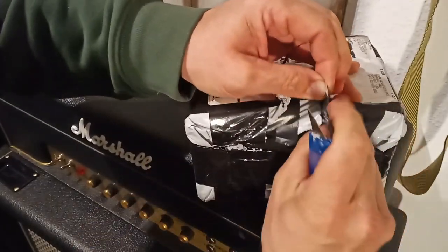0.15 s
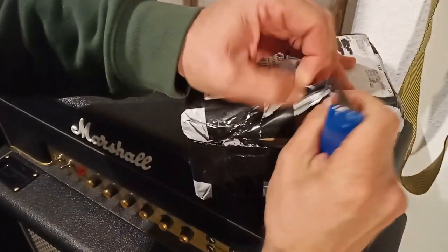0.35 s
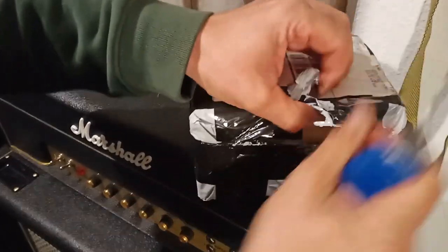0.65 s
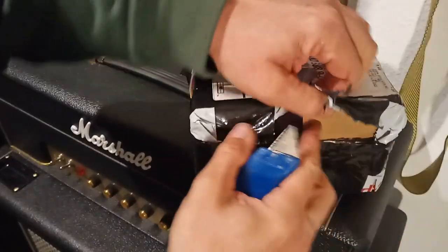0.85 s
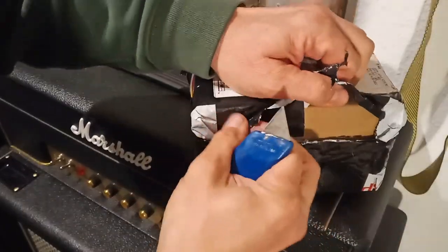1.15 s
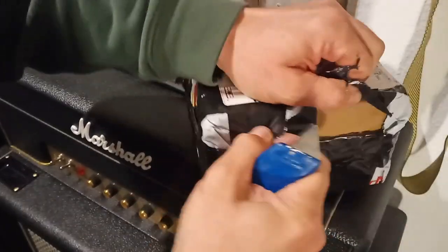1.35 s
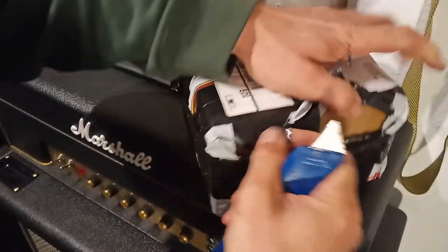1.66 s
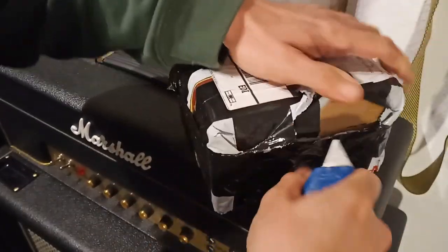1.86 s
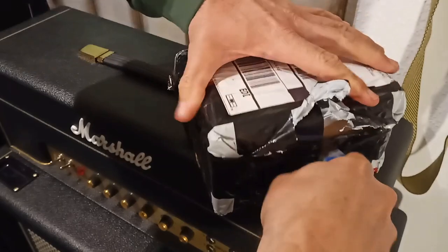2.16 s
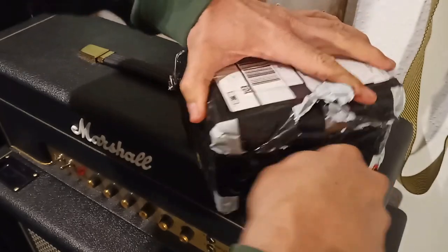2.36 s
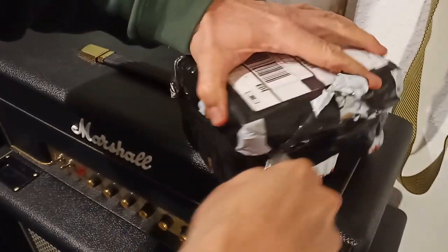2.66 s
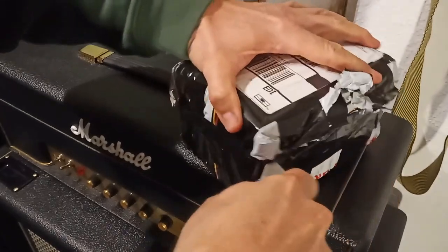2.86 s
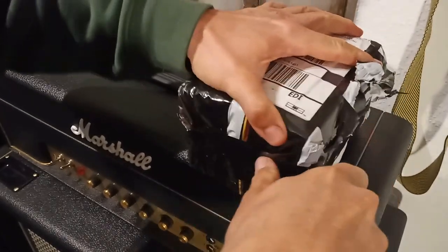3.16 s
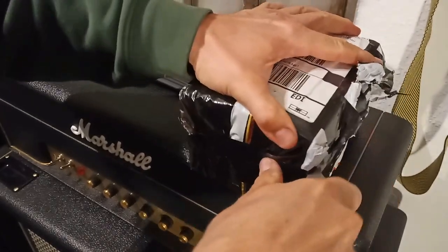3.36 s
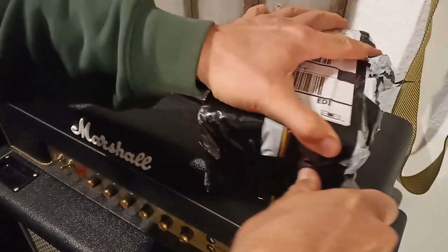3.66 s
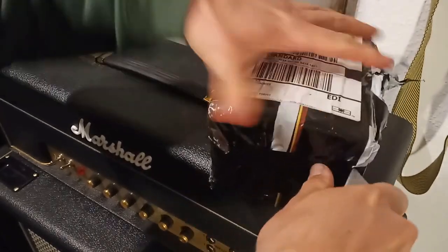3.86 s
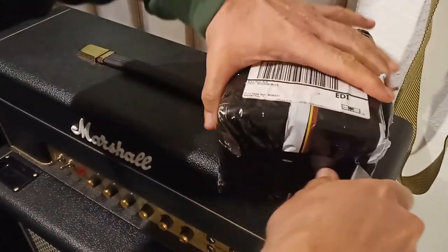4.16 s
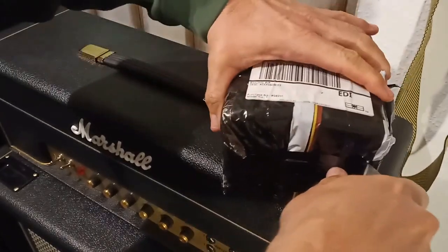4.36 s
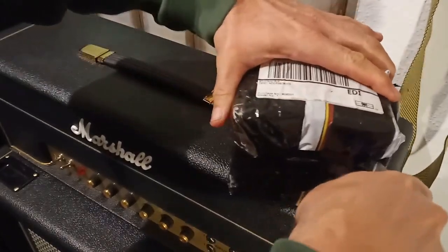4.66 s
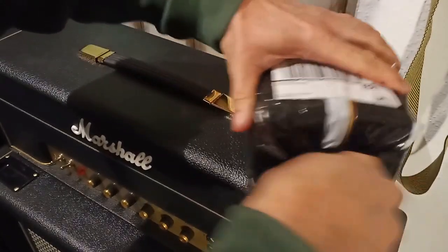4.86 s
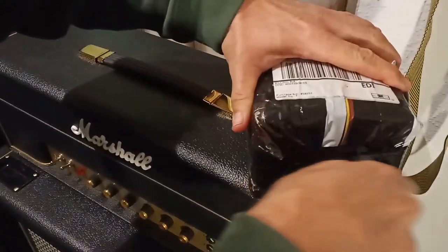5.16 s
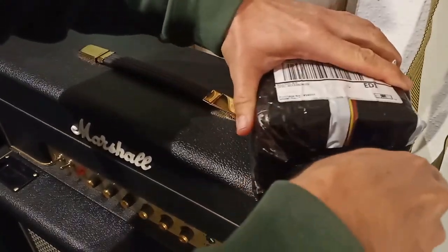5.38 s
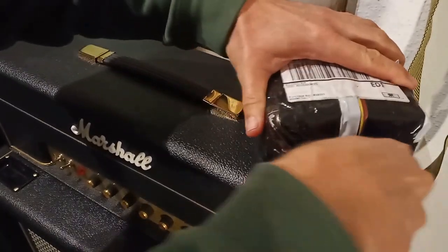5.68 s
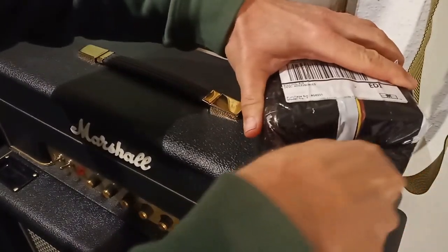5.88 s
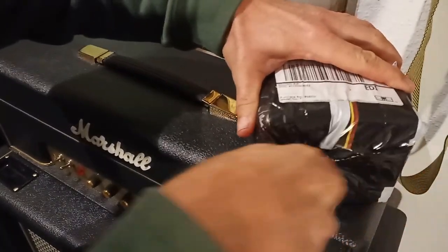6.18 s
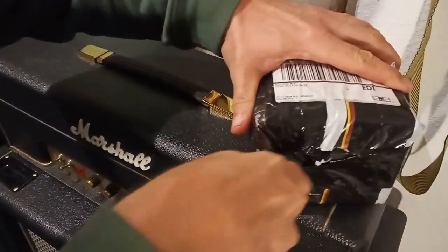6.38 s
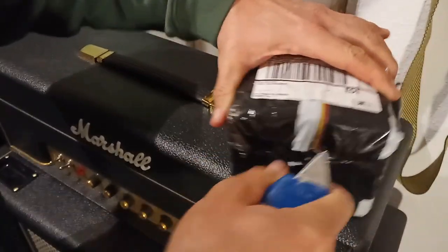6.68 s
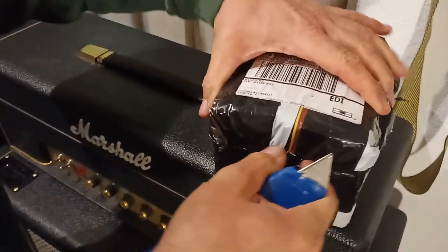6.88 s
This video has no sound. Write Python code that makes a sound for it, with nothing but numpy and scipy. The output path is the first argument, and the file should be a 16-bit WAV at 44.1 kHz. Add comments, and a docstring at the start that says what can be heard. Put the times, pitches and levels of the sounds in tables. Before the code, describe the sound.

A blade cuts and tugs at crinkly plastic film and tape on a small hollow cardboard box, with sharp snaps and dull thumps, close up indoors.

```python
"""A small furnished room: a utility knife works through the plastic film and tape round a cardboard parcel.
Blade and fingers rub in dense stick-slip clicks that ring the facets of the film; creases snap as noise bursts.
The same forces excite the modes of the hollow box, which is also bumped, jolted and slid on its support.
Taps ring the blade; nearby reflections, a decaying room and faint air noise surround the parcel."""
import sys
import numpy as np
from scipy import signal
from scipy.fft import rfft, irfft, next_fast_len
from scipy.io import wavfile
from scipy.ndimage import uniform_filter1d

SR = 44100
rng = np.random.default_rng(int(sys.argv[2]) if len(sys.argv) > 2 else 0)


def materialize(psi):
    """Save the field psi as 16-bit PCM at rate SR to the path in sys.argv[1].

    A 1-D psi becomes a single channel; in a 2-D psi each row is a channel.
    """
    bounded = np.clip(np.atleast_2d(psi).T, -1, 1)
    quanta = np.round(bounded * 32767).astype(np.int16)
    wavfile.write(sys.argv[1], SR, quanta)


N = 310023
TIME = np.arange(N) / SR  # seconds


def from_db(db):
    """Level to amplitude: 20 dB is a factor of ten."""
    return 10 ** (np.asarray(db) / 20)


def rms_one(x):
    """Normalisation by mean power: rms 1."""
    return x / np.sqrt(np.mean(x ** 2) + 1e-20)


def energy_one(x):
    """Normalisation by energy: sum of squares 1."""
    return x / np.sqrt(np.sum(x ** 2) + 1e-20)


def at_hz(points, hz):
    """Interpolate a spectrum table along logarithmic frequency."""
    known, values = np.transpose(points)
    return np.interp(np.log(np.maximum(hz, 1)), np.log(known), values)


def band(x, low_hz, high_hz, order=2):
    """Band-pass filtering with a maximally flat (Butterworth) passband."""
    edges_hz = [low_hz, min(high_hz, SR / 2 - 500)]
    return signal.sosfilt(signal.butter(order, edges_hz, "band", fs=SR, output="sos"), x)


def ring(x, hz, t60):
    """Damped resonance: a pole pair dies by 60 dB in t60 seconds and answers a click with unit energy."""
    radius, angle = from_db(-60 / (t60 * SR)), 2 * np.pi * hz / SR
    zeros = np.sqrt((1 - radius ** 2) / 2) * np.array([1, 0, -1])
    poles = [1, -2 * radius * np.cos(angle), radius ** 2]
    return signal.lfilter(zeros, poles, x + 1e-18)  # the offset avoids denormal numbers


def bell(x, hz, gain_db, q):
    """Peaking equalisation: raise or lower the spectrum about one frequency."""
    gain, angle = from_db(gain_db / 2), 2 * np.pi * hz / SR
    width = np.sin(angle) / (2 * q)
    zeros = [1 + width * gain, -2 * np.cos(angle), 1 - width * gain]
    poles = [1 + width / gain, -2 * np.cos(angle), 1 - width / gain]
    return signal.lfilter(zeros, poles, x)


def noise(spectrum):
    """Coloured noise: white noise shaped in the frequency domain, rms 1."""
    size = next_fast_len(N)
    gain = from_db(at_hz(spectrum, np.fft.rfftfreq(size, 1 / SR)))
    shaped = irfft(rfft(rng.standard_normal(size)) * gain, size)
    return rms_one(shaped[:N])


def even(x, span_s):
    """Level equalisation by running rms: steady over the span, with the grain inside it kept."""
    power = uniform_filter1d(x ** 2, max(int(span_s * SR), 2))
    return x / np.sqrt(np.maximum(power, 1e-12))


def drift(per_s):
    """Slow random modulation: normal random knots of spread 1 joined by straight lines."""
    knots = np.arange(0, TIME[-1] + 1, 1 / per_s)
    return np.interp(TIME, knots, rng.standard_normal(len(knots)))


def burst(t, rise_s, fall_s):
    """Transient noise: exponential growth up to t = 0, exponential decay after it, unit energy."""
    return energy_one(rng.standard_normal(len(t)) * np.exp(np.minimum(t / rise_s, -t / fall_s)))


def add(out, s, sound):
    """Superposition: mix a sound in at a time in seconds."""
    at = int(np.clip(round(s * SR), 0, N - 1))
    out[at:at + len(sound)] += sound[:N - at]


def still_air():
    """Stationary background noise: the still air of the room."""
    # colour of the air noise: hz, level_db (relative, per Hz)
    air_colour = [(30, -10), (150, -8.5), (400, -12.5), (1050, -21.5), (1500, -1.5), (3200, -9), (5000, -4),
                  (9000, -10.5), (15000, -16)]
    return from_db(-81.0) * noise(air_colour)


def room(x, wet_db=-5, low_wet_db=-2, gap_s=0.00061, count=9):
    """Reverberation: dense reflections as decaying noise bands, with a decay time set by frequency."""
    # reverberation time: hz, t60_s
    decay_times = [(150, 0.31), (400, 0.17), (1000, 0.13), (2800, 0.17), (7000, 0.12), (15000, 0.078)]
    t, tail = TIME[:SR // 2], 0
    edges = np.geomspace(60, 18000, count + 1)
    for low, high in zip(edges, edges[1:]):
        hz = np.sqrt(low * high)
        dying = from_db(-60 * t / at_hz(decay_times, hz)) * (t > gap_s)
        reflections = energy_one(band(rng.standard_normal(len(t)) * dying, low, high))
        level = from_db(wet_db + at_hz([(300, low_wet_db), (1500, -0.56), (12000, -3.0)], hz))
        tail = tail + level * np.sqrt(2 * (high - low) / SR) * reflections  # share of the bandwidth
    return x + signal.fftconvolve(x, tail)[:N]


def nearby(x):
    """Early reflection: delayed weak copies from the hand and the support interfere with the direct sound."""
    # first reflections: delay_s, level_db
    echoes = [(.00045, -25), (.0027, -23)]
    out = x.copy()
    for delay_s, db in echoes:
        out += from_db(db) * np.interp(TIME - delay_s, TIME, x, left=0)
    return out


def box(force, hardness=1):
    """Modal synthesis: a force excites the modes of the hollow box; hardness scales those above 400 Hz."""
    # modes of the cardboard box: hz, level_db (relative), t60_s
    box_modes = [(95, -5.5, 0.064), (135, -2.5, 0.14), (162, -0.5, 0.044), (224, 0, 0.096),
                 (316.7, -6, 0.049), (373, -1, 0.094), (448, -1, 0.071), (538.5, 3, 0.039),
                 (638, -2, 0.061), (707, 1.5, 0.063), (787, 4.5, 0.023)]
    weights = energy_one(from_db([db for hz, db, t60 in box_modes]))
    out = 0
    for k, (hz, db, t60) in enumerate(box_modes):
        drive = force * (hardness if hz > 400 else 1)
        out = out + (-1) ** k * weights[k] * ring(drive, hz, t60)  # neighbours in opposite phase
    return out


def slides(stick_db=7.0):
    """Sliding friction: film on a grained surface hisses, and a soft rub stirs the low modes of the box."""
    # turns of the parcel on its support: start_s, fastest_s, end_s, box_db, hiss_db
    turns = [(0.962, 1.005, 1.04, -59, -81), (1.824, 1.93, 2.125, -70, -66.5),
             (2.898, 3.03, 3.367, -61, -61.5), (3.507, 3.517, 3.85, -62.5, -64.5),
             (6.743, 6.92, 6.97, -61, -56)]
    # colour of the sliding hiss: hz, level_db (relative, per Hz)
    hiss_colour = [(700, -10.5), (1120, -19), (1350, 4), (1520, -3.5), (1700, 1), (2800, -2), (3500, -4),
                   (6000, -5), (7500, -14.5), (12000, -12), (15000, -22)]
    push, hiss = np.zeros(N), np.zeros(N)
    for start, fastest, end, box_db, hiss_db in turns:
        speed = np.interp(TIME, [start, fastest, end], [0, 1, 0])
        push += from_db(box_db) * speed ** 1.1
        hiss += from_db(hiss_db) * speed ** 0.76
    rub = rms_one(band(box(rng.standard_normal(N)), 173, 440, order=4))
    return push * rub + hiss * noise(hiss_colour) * from_db(stick_db * drift(35))


def bumps(contact_s=0.0027):
    """Soft impact: contact swells over a few milliseconds and rings one decaying mode of the parcel."""
    # soft bumps: start_s, peak_db, pitch_hz, t60_s
    contacts = [(0.14, -33.5, 954, 0.013), (0.146, -32, 242, 0.05), (0.289, -40.5, 312, 0.086),
                (0.312, -34, 220, 0.11), (0.572, -39, 135, 0.09), (0.746, -52.5, 99, 0.049),
                (1.203, -51, 134, 0.038), (2.537, -33.5, 481, 0.05), (2.694, -27.5, 452, 0.04),
                (3.955, -45, 140, 0.039), (3.985, -53.5, 1404, 0.02), (6.523, -42, 135, 0.03)]
    out, t = np.zeros(N), TIME[:SR // 2]
    for s, db, hz, t60 in contacts:
        swell = 1 - np.exp(-(t / contact_s) ** 2)
        swing = swell * from_db(-60 * t / t60) * np.sin(2 * np.pi * hz * t)
        add(out, s, from_db(db) * swing / np.abs(swing).max())
    return out


def taps():
    """Impulse response: each touch of the blade is a click that rings the modes of blade and holder."""
    # light touches: start_s, force_db
    touches = [(2.291, -25), (4.08, -43.5), (4.437, -29.5), (4.543, -39.5)]
    # modes of the blade in its holder: hz, level_db (relative), t60_s
    blade_modes = [(763, 1, 0.044), (1270, -11, 0.16), (2736, -4, 0.05), (3190, -3, 0.092),
                   (4350, -15, 0.074), (6228, -5, 0.041), (7730, -2, .05), (9970, 0, 0.028)]
    force = np.zeros(N)
    for s, db in touches:
        add(force, s, from_db([db]))
    weights = energy_one(from_db([db for hz, db, t60 in blade_modes]))
    return sum(weight * ring(force, hz, t60) for weight, (hz, db, t60) in zip(weights, blade_modes))


def jolts(cycles=12.0, box_db=-7):
    """Elastic recoil: the panel under the blade springs back, dies within a few cycles and rings the box."""
    # the blade breaks through and jolts the cardboard: start_s, energy_db, pitch_hz
    breakthroughs = [(2.5352, -13.5, 520), (6.328, -3, 1730), (6.3287, -5.5, 553)]
    out = np.zeros(N)
    for s, db, hz in breakthroughs:
        blow = from_db(db) * signal.unit_impulse(SR // 4)
        panel = ring(blow, hz, cycles / hz)
        add(out, s, panel + from_db(box_db) * box(blow))
    return out


def effort():
    """Additive power: overlapping strokes sum into gains of film and box; power weights their colour in dB."""
    # strokes of blade and fingers: start_s, hardest_s, end_s, film_db, box_db,
    # brightness_db (narrow facets over wide), sizzle_db (relative to the film)
    stroke_rows = [(0.0, 0.15, 0.2, -50, -53, -1, -15), (0.2, 0.206, 0.28, -51.5, -57, 1.5, -2),
                   (0.3, 0.31, 0.43, -54, -54, 3, -13), (0.398, 0.498, 0.55, -50, -65, 4, -2),
                   (0.565, 0.583, 0.65, -39, -46.5, -1, -1), (0.654, 0.674, 0.79, -52, -54.5, 5.5, -6),
                   (0.794, 0.89, 1.04, -55.5, -62, 6, -7), (0.962, 1.19, 1.17, -53.5, -58.5, 10, 1.5),
                   (1.189, 1.212, 1.26, -46, -59, 9, -1), (1.328, 1.344, 1.42, -58.5, -90, 9, -3),
                   (1.397, 1.515, 1.608, -50.5, -59.5, 7, -5.5), (1.605, 1.64, 1.723, -51, -58.5, 6, -3.5),
                   (1.712, 1.727, 1.88, -52.5, -81, 5.5, -2), (1.804, 1.817, 1.91, -49.5, -58, 12, -3.5),
                   (1.96, 1.983, 2.08, -63.5, -83, 20, 3), (2.169, 2.257, 2.26, -55, -67, 3, -9),
                   (2.309, 2.325, 2.343, -39.5, -39.5, 0.5, -6), (2.42, 2.458, 2.62, -53, -50, 7, 0),
                   (2.477, 2.53, 2.538, -32.5, -30, 4, -1), (2.616, 2.635, 2.72, -30.5, -31, 5, -6),
                   (2.728, 2.813, 2.84, -44, -41, 4, -4), (2.875, 2.885, 2.93, -61.5, -62, 3, -5),
                   (2.972, 3.044, 3.1, -63, -65, 6, -22), (3.513, 3.62, 3.56, -72.5, -77.5, 2, -9),
                   (3.798, 3.803, 4, -69.5, -88, 15, 5.5), (3.866, 3.869, 3.9, -58, -81, -5.5, -12),
                   (3.936, 3.984, 3.96, -56.5, -59.5, -7, 1), (4.082, 4.084, 4.13, -65.5, -83.5, 12, -4.5),
                   (4.225, 4.238, 4.29, -54, -61.5, 4, 5.5), (4.3, 4.31, 4.343, -49, -60.5, 4, -8),
                   (4.435, 4.452, 4.44, -53, -71, 3, -13), (4.543, 4.549, 4.55, -51, -80, -3, -12),
                   (4.6, 4.763, 5, -70, -89.5, 3, -5.5), (4.861, 4.872, 4.92, -58, -52.5, 0, -26),
                   (4.943, 4.999, 5.012, -41, -35.5, 2, 0), (5.038, 5.036, 5.075, -43.5, -42.5, -3.5, -0.5),
                   (5.199, 5.202, 5.23, -51, -41, -9, -11.5), (5.238, 5.243, 5.32, -54, -69, 12, -1),
                   (5.42, 5.424, 5.445, -49.5, -78, 0, -17), (5.487, 5.505, 5.48, -47, -43, 6, -6),
                   (5.625, 5.631, 5.64, -49, -43, 0, -13), (5.744, 5.779, 5.8, -57.5, -52, -0.5, -7.5),
                   (5.793, 5.818, 5.85, -39, -40, -7, -10), (5.864, 5.876, 5.915, -41.5, -46, -4, -5),
                   (5.925, 5.944, 6.07, -54, -54, 4, -1.5), (5.986, 6.096, 6.1, -43, -47.5, 2, 0.5),
                   (6.142, 6.207, 6.27, -50.5, -58.5, 7, 1.5), (6.3, 6.339, 6.41, -37.5, -39, 3, -1.5),
                   (6.389, 6.388, 6.47, -56, -53, 6, 6), (6.515, 6.521, 6.49, -47, -48, -3, 8),
                   (6.611, 6.652, 6.76, -50.5, -65, 8.5, -3.5), (6.709, 6.78, 7.1, -61.5, -82, 12, -5)]
    # the holding hand barely stirs film and box
    hold_film_db, hold_box_db, hold_sizzle_db = -82, -91, -8.5
    # a stroke takes hold faintly, bites, swells to its hardest moment, sags and lets go
    grip_s, grip_share, bite_s, let_go_s = 0.03, 0.083, 0.0055, 0.012
    swell_db, sag_db = 7, 9
    film_power = np.full(N, from_db(hold_film_db) ** 2)
    push_power = np.full(N, from_db(hold_box_db) ** 2)
    bright_sum, sizzle_sum = np.zeros(N), film_power * hold_sizzle_db
    for start, hardest, end, film_db, box_db, bright_db, sizzle_db in stroke_rows:
        span = slice(*np.searchsorted(TIME, [start - bite_s - grip_s, end + 10 * let_go_s]))
        t = TIME[span]
        contact = np.interp(t - start, [-bite_s - grip_s, -bite_s, 0], [0, grip_share, 1])
        contact = contact * np.exp(-np.maximum(t - end, 0) / let_go_s)
        shape = contact * from_db(np.interp(t, [start, hardest, end], [-swell_db, 0, -sag_db]))
        power = (from_db(film_db) * shape) ** 2
        film_power[span] += power
        push_power[span] += (from_db(box_db) * shape) ** 2
        bright_sum[span] += power * bright_db
        sizzle_sum[span] += power * sizzle_db
    bright, sizzle = from_db(bright_sum / film_power), from_db(sizzle_sum / film_power)
    return np.sqrt(film_power), np.sqrt(push_power), bright, sizzle


def crinkles(film, sizzle, count=400):
    """Poisson process: random snaps follow the rubbing level; returns rows with the columns of snaps."""
    per_s, top_db, onset_db = 18, -22.5, -72  # rate, greatest energy, least rubbing level
    above_film_db, scatter_db = 27, 4
    push_db, bright_db, extra_sizzle_db = -22, 8, -1.5
    times = np.cumsum(rng.exponential(1 / per_s, count))
    film_db = 20 * np.log10(np.interp(times, TIME, film))
    sizzle_db = 20 * np.log10(np.interp(times, TIME, sizzle))
    level, push, bright = scatter_db * rng.standard_normal((count, 3)).T
    db = np.minimum(film_db + above_film_db + level, top_db)
    rows = np.transpose([times, db, push_db + push, bright_db + 2 * bright, extra_sizzle_db + sizzle_db])
    return list(rows[(times < TIME[-1]) & (film_db > onset_db)])


def snaps(rows, rise_s=0.0004, fall_s=0.00056, swell_s=0.00084, flutter_s=0.0024, flutter_db=-8,
          knock_db=-3, box_db=-2, facet_db=5.5, size=1500):
    """Buckling: a crease gives way in one sharp step and flutters, coloured by random resonances."""
    out, force, lead = np.zeros(N), np.zeros(N), size // 6
    t = (np.arange(size) - lead) / SR
    for s, db, push_db, bright_db, sizzle_db in rows:
        crack = burst(t, rise_s, fall_s) + from_db(flutter_db) * burst(t, swell_s, flutter_s)
        crack[lead] += .8  # the sharp step
        crack = bell(crack, rng.uniform(1000, 4500), facet_db, q=1.7)
        crack = bell(crack, rng.uniform(2800, 7200), facet_db, q=4.7)
        dull = energy_one(band(crack, 1000, 2970, order=3))
        bright = energy_one(band(crack, 2860, 7660, order=3))
        sound = energy_one(dull - from_db(bright_db) * bright)
        sound += from_db(sizzle_db) * energy_one(band(crack, 7600, 16800, order=3))
        sound += from_db(push_db + knock_db) * energy_one(band(crack, 220, 646))
        add(out, s - lead / SR, from_db(db) * sound)
        add(force, s, from_db([db + push_db + box_db]))
    return out + box(force)


def slips(per_s, spread_db):
    """Stick-slip friction: releases of random sign at random moments, many weak and a few strong."""
    sizes = from_db(spread_db * np.minimum(rng.exponential(1, N), 4)) * rng.choice([-1, 1], N)
    return sizes * (rng.random(N) < per_s / SR)


def crackle(clicks, cycles, wander_db=6.5, hiss=0.97, count=22):
    """Facet resonance: slips and friction ring facets of film whose levels wander; returns wide and narrow."""
    # colour of rubbed film: hz, level_db (relative, per Hz)
    film_colour = [(800, 38), (1100, -21.5), (1500, 0.5), (2300, -11.5), (3300, 9), (4500, -9),
                   (6000, 13.5), (7500, -31.5), (10000, -22.5)]
    facet, wide, narrow = rng.integers(0, count, N), 0, 0
    for k, hz in enumerate(np.geomspace(1000, 7000, count)):
        friction = hiss * np.std(clicks) / np.sqrt(count) * rng.standard_normal(N)
        drive = clicks * (facet == k) + friction  # each slip strikes one facet
        level = np.sqrt(hz) * from_db(at_hz(film_colour, hz) + wander_db * drift(26))
        sound = ring(drive, hz, cycles / hz) * level
        if hz < 3000:
            wide = wide + sound
        else:
            narrow = narrow + sound
    return even(band(wide, 830, 6700), 0.014), even(band(narrow, 1500, 9600), 0.04)


def strokes(film, push, bright, sizzle, film_db=-1.0, sizzle_db=-2, box_db=-3, thud_db=-11,
            catch_db=3.0, hard_db=-43, hardening=0.12):
    """Coupled friction: sawing slips crackle in the film and also shake the box."""
    clicks = slips(per_s=1500, spread_db=5.0)
    wide, narrow = crackle(clicks, cycles=25.0)
    # taut film buckles in narrower facets and sounds brighter
    grains = (wide + bright * narrow) / np.sqrt(1 + bright ** 2)
    friction = 0.73 * rng.standard_normal(N) * np.std(clicks)
    fine = even(band(clicks + friction, 6900, 13000), 0.036)
    # now and then a whole small crease flips: single crisp ticks
    ticks = rms_one(band(slips(per_s=110, spread_db=2.5), 2600, 9000))
    skin = from_db(film_db) * grains + from_db(sizzle_db) * sizzle * fine + from_db(-10.5) * ticks
    skin = signal.sosfilt(signal.butter(4, 850, "high", fs=SR, output="sos"), skin)
    catching = from_db(catch_db * drift(130))  # the edge catches and lets go
    force = push * catching * even(clicks + slips(per_s=1600, spread_db=2.0), 0.058)
    # a harder push reaches further into the upper modes of the box
    hardness = np.clip((push / from_db(hard_db)) ** hardening, .3, 1.8)
    thud = push * even(band(force / push, 150, 660), 0.049)
    body = from_db(box_db) * box(force, hardness) + from_db(thud_db) * thud
    return film * catching * skin + band(body, 77, 900, order=3)


def scene():
    """Superposition of sources: the parcel close by, its reflections, the room and the air."""
    # single snaps of film and tape, strong and weak: start_s, energy_db, push_db (on the box, relative
    # to the snap), brightness_db (upper band over lower), sizzle_db (relative to the snap)
    snap_rows = [(0.0842, -15.5, -8.5, 5, -9), (0.2093, -31, -22, 14, 8.5), (0.2609, -17, -22, 3, -13),
                 (0.2888, -23, -23, 1, -28), (0.3122, -17, -5, 29, -3), (0.347, -25, -22, -5, -3),
                 (0.42, -21, -14, 5, 2.5), (0.4275, -12.5, -18, 7, 2), (0.4821, -21, -22, -1, -9),
                 (0.5585, -18.5, -31.5, 23, -8), (0.5688, -10.5, -17, 20, -5), (0.5732, -3.5, -6, 5, 1),
                 (0.5972, -4, -32, 9, -7), (0.6103, -17, -29, 21, -1), (0.6216, -17, -7.5, 3, -22),
                 (0.6359, -11, -30, 7, -6), (0.721, -17, -14, 16, -9), (0.7734, -18.5, -33, 19, -11),
                 (0.8885, -18.5, -38, 13, -6), (1.0325, -29, -6, 34, 9), (1.129, -24, -28, 11, -6),
                 (1.2184, -19.5, -10.5, 35, 8), (1.2327, -15.5, -37, -2, -2), (1.3445, -23, -38, 7.5, -6),
                 (1.4113, -12.5, -36, 11, 3.5), (1.496, -19.5, -36, 9, -6), (1.7318, -22.5, -40, 10, -11),
                 (1.7599, -17.5, -40, 11.5, 5.5), (1.8551, -26, -16, 27, 7), (1.9977, -38, -26, 9, 15),
                 (2.173, -29, -40, 5, -0.5), (2.2275, -15, -17.5, -4.5, -6.5), (2.3124, -18, 5.5, 4, -8),
                 (2.4865, -14.5, 0, 1, -8), (2.5043, -12.5, -1, -3, -2), (2.5169, -11, -2, -10, -15),
                 (2.5348, -3.5, 0.5, 5, -8), (2.6505, -6.5, -5, 6.5, -13), (2.697, -4.5, -5.5, 25, -4.5),
                 (2.7725, -16.5, -29, 24, 0), (2.7853, -7, -5, 5.5, -13), (2.8217, -15, -5, 1, 0),
                 (2.8445, -18.5, -30, 4, -1), (3.0662, -24.5, -21, 20, -29), (3.1047, -22.5, -4.5, -1, -14),
                 (3.251, -30.5, -2.5, 5, 7), (3.4337, -32, -31.5, 14, -13), (3.6208, -26.5, -24, 11.5, 3),
                 (3.747, -24.5, -36, 8, -3.5), (3.889, -27.5, -30, 16, -5), (4.3117, -21.5, -13, 13, -32),
                 (4.3254, -22.5, -25, 18, 4.5), (4.8682, -19.5, -7, -7.5, -29),
                 (4.9135, -30.5, -21, 14, 5.5), (4.9247, -27, -17, 4, 1), (4.9431, -11.5, -22, -20, -7.5),
                 (5.005, -16, -27.5, 4, -7), (5.0353, 2, -8.5, -2.5, -11.5), (5.159, -29.5, -40, 27, 3.5),
                 (5.1755, -18, -23, -31, -32), (5.2474, -11, -9, -3.5, -4.5), (5.2835, -29, -30, 8, 2),
                 (5.4762, -29.5, -25, -12, 3), (5.4952, -8.5, -21, 5.5, -3), (5.6246, -17, -10.5, 4, -12),
                 (5.7897, -14, -19, 0, -8), (5.8169, 0.5, -10, -5, -7), (5.874, 2.5, -8.5, -4.5, -12),
                 (5.9797, -23.5, -13, -7, 12), (6.0035, -15, -1.5, -22, 11.5), (6.0456, -9.5, -40, 13, 6),
                 (6.0775, -18, -4.5, 4, 2), (6.1002, -9, -20, 6, -0.5), (6.1492, -16, -35, 7, -12),
                 (6.1733, -14, -16, 5, 0), (6.197, -9.5, -25, 11, 1.5), (6.2062, -22, -21.5, 11, -5),
                 (6.2485, -8.5, -25, 4.5, 6), (6.2866, -17, -36, 4, 13.5), (6.303, -8.5, -4.5, 3, 3.5),
                 (6.3112, -7, -28, 2, 5.5), (6.3138, -4, -35, 27, 1), (6.3588, -12, -1, 0, 8),
                 (6.4195, -17.5, -31, 7, 2.5), (6.4431, -18, -11, -2, -11),
                 (6.5259, -8.5, -17.5, 2.5, -1.5), (6.5823, -17, -37, 0, -16), (6.5884, -18.5, -30, 7, -5),
                 (6.652, -21.5, -16, -3, -6), (6.7271, -24, -47, 26, 0.5)]
    film, push, bright, sizzle = effort()
    parcel = slides() + bumps() + taps() + jolts()
    parcel += snaps(list(snap_rows) + crinkles(film, sizzle))
    parcel += strokes(film, push, bright, sizzle)
    return (room(from_db(-0.5) * nearby(parcel)) + still_air())[None]


def record(dry):
    """Transducer response: a small microphone with treble dips, a port resonance and a steep upper cutoff."""
    x = bell(dry, 7970, gain_db=-6, q=6.5)
    x = bell(x, 13500, gain_db=-6, q=4)
    x = bell(x, 15200, gain_db=7, q=10)  # the port
    cutoff_hz = 15900
    return signal.sosfilt(signal.ellip(10, .3, 70, cutoff_hz, fs=SR, output="sos"), x)


dry = scene()
out = record(dry)
materialize(out)
```